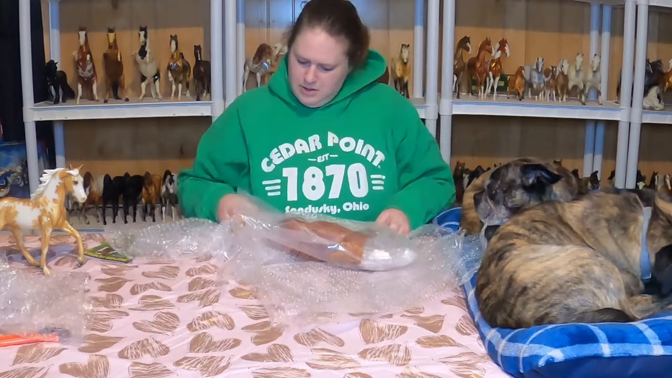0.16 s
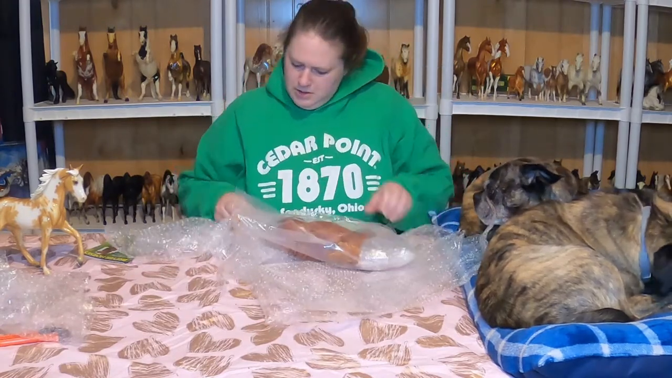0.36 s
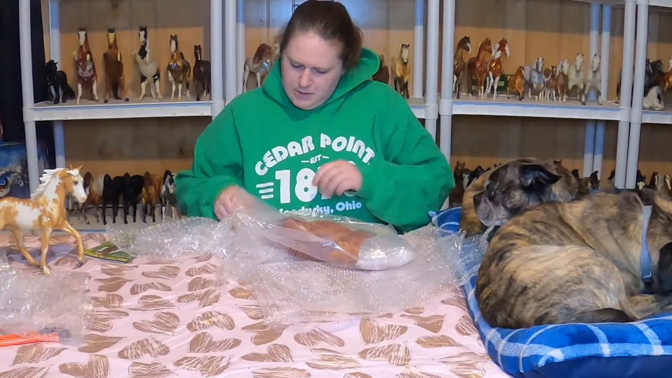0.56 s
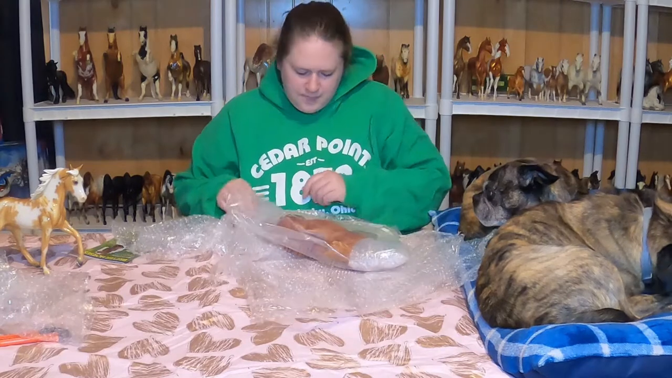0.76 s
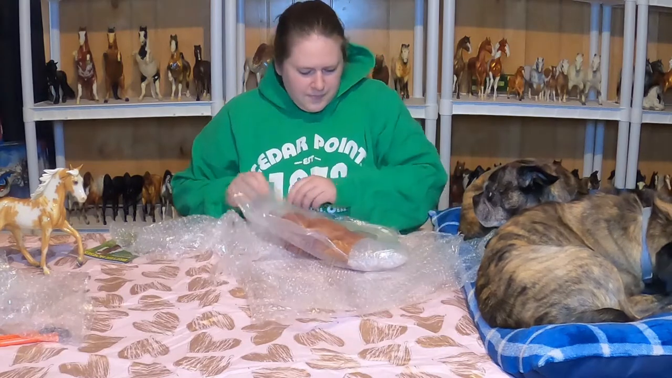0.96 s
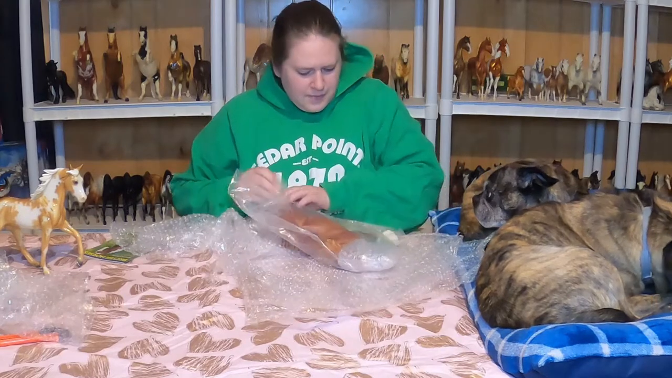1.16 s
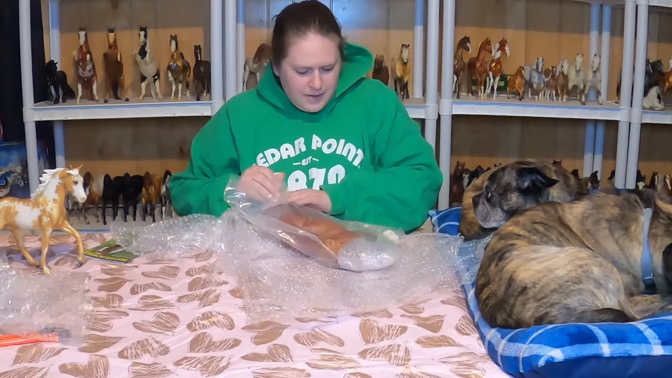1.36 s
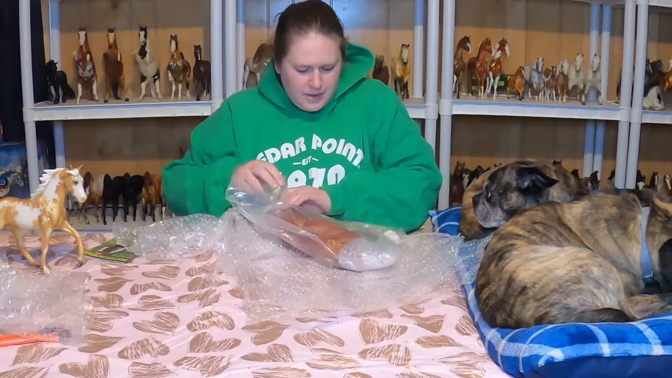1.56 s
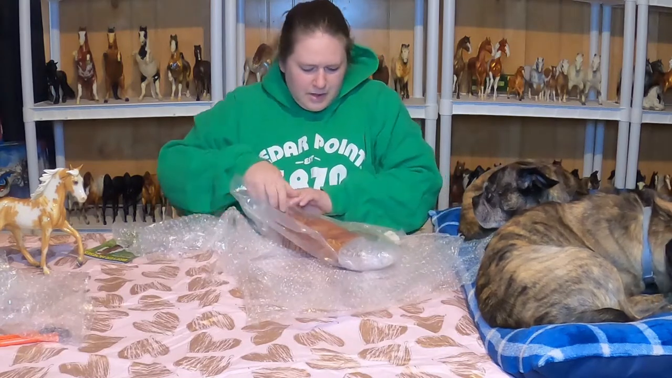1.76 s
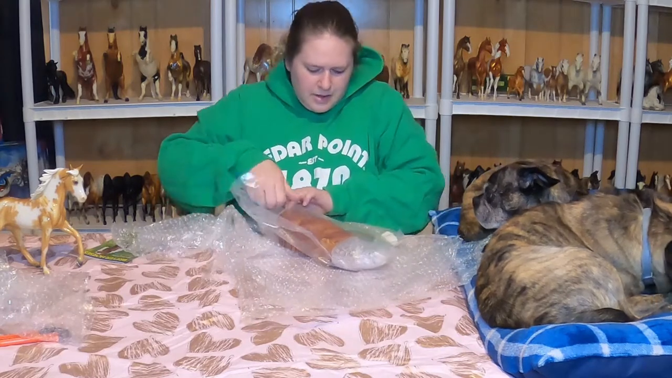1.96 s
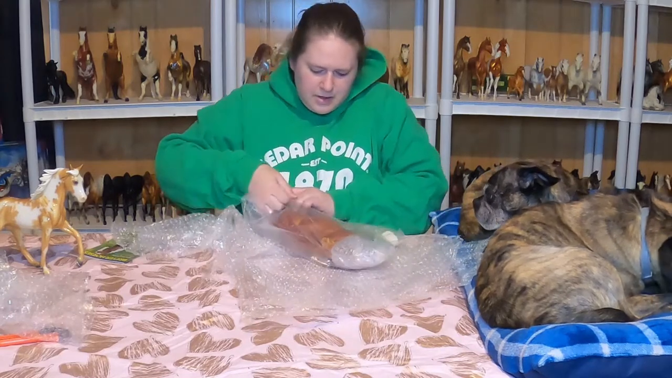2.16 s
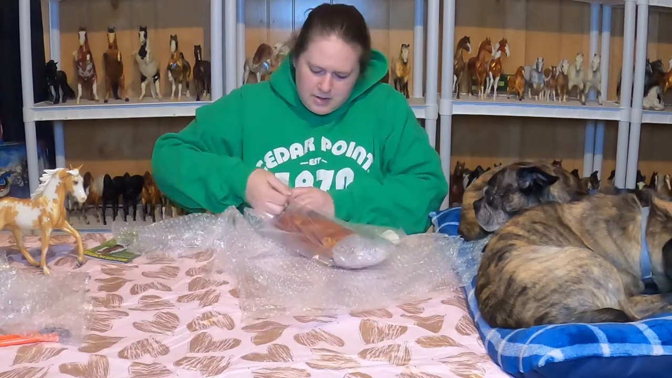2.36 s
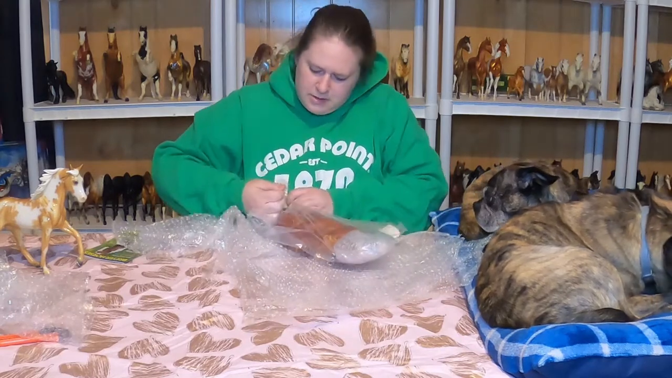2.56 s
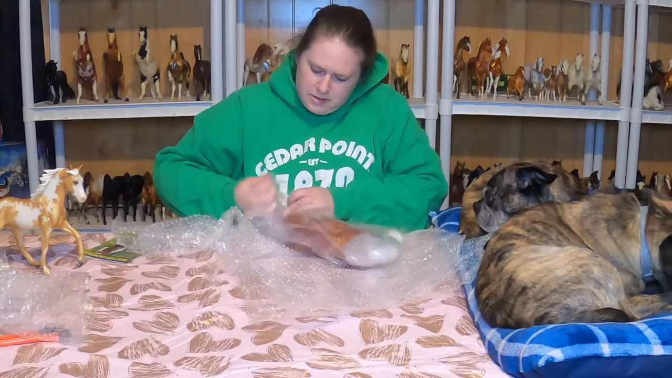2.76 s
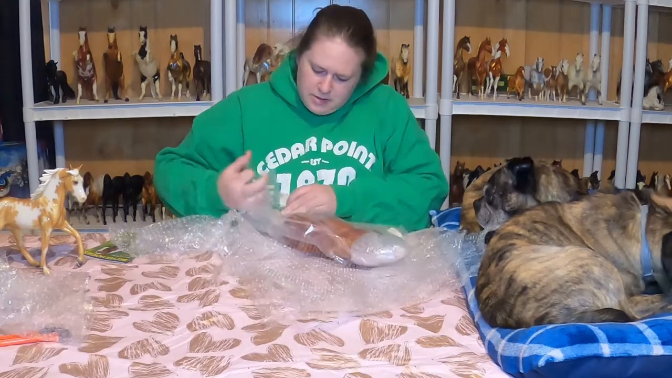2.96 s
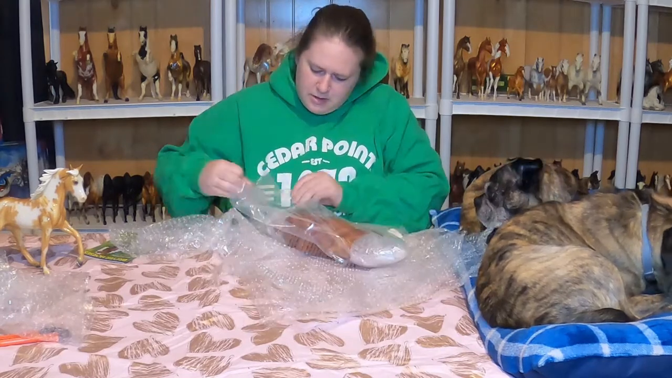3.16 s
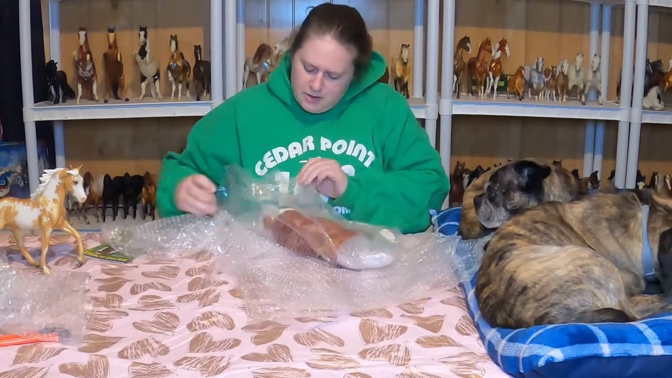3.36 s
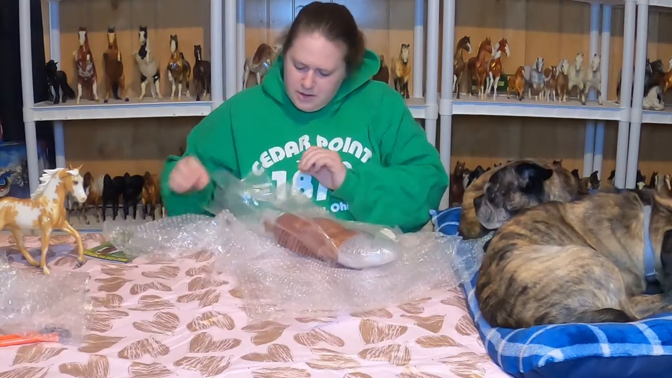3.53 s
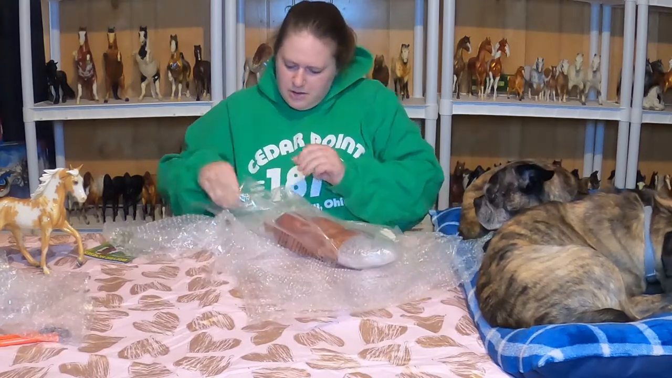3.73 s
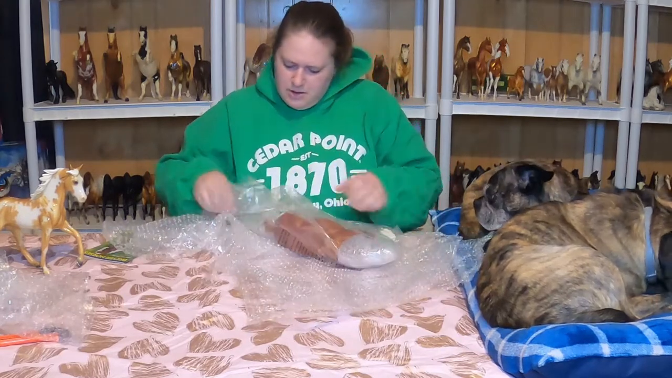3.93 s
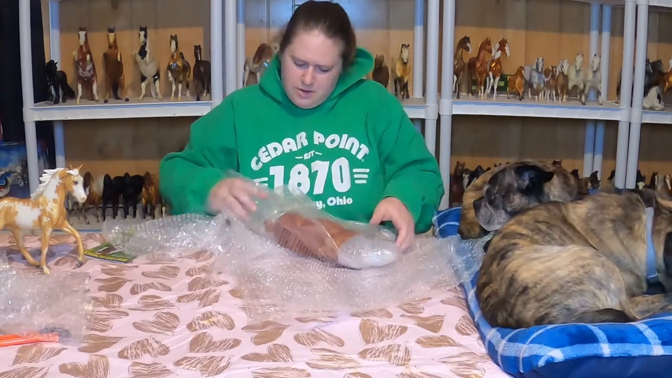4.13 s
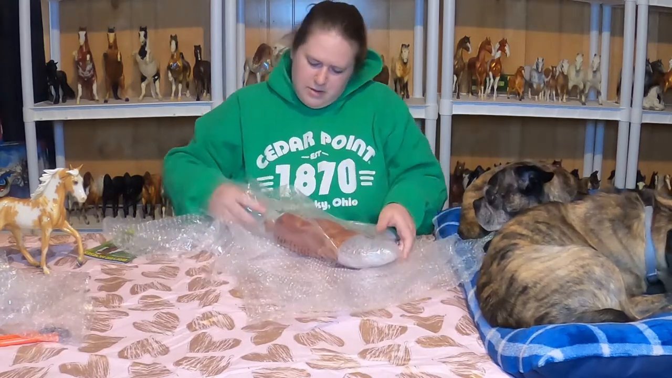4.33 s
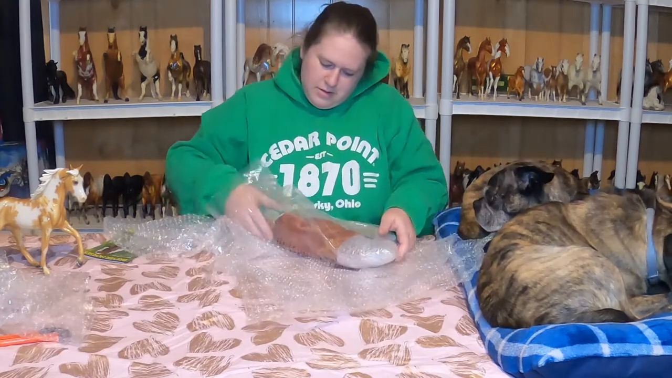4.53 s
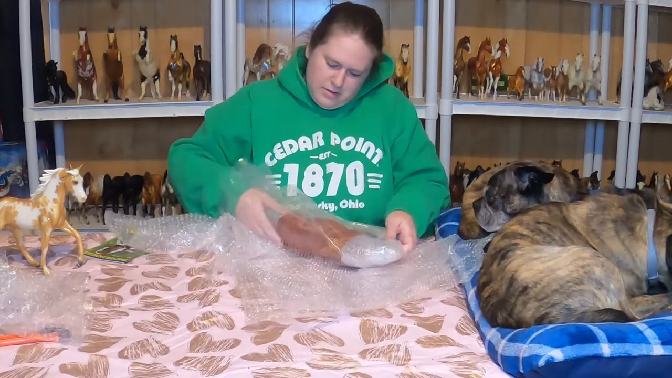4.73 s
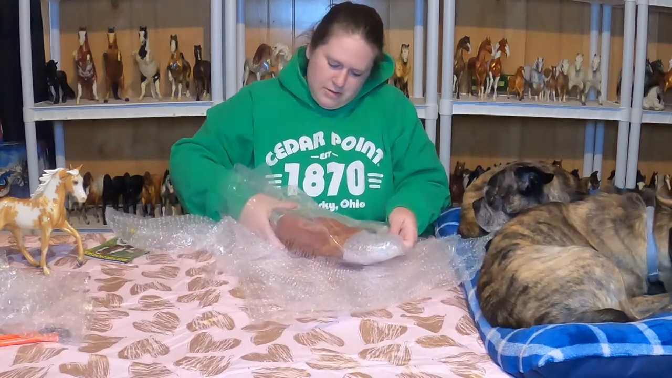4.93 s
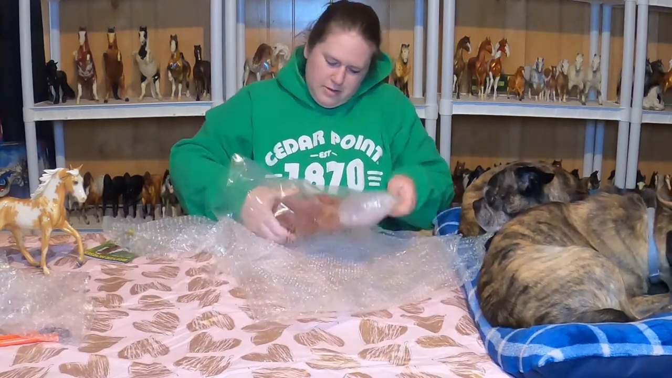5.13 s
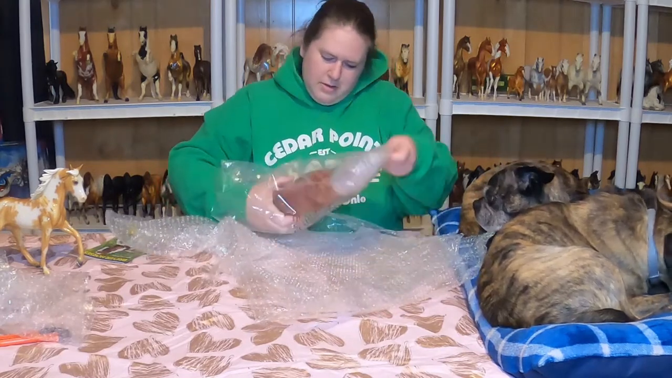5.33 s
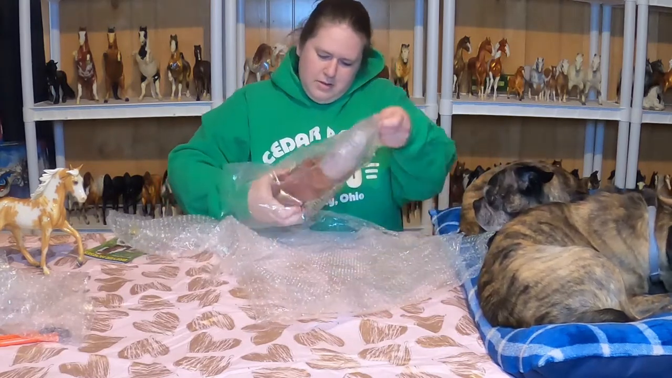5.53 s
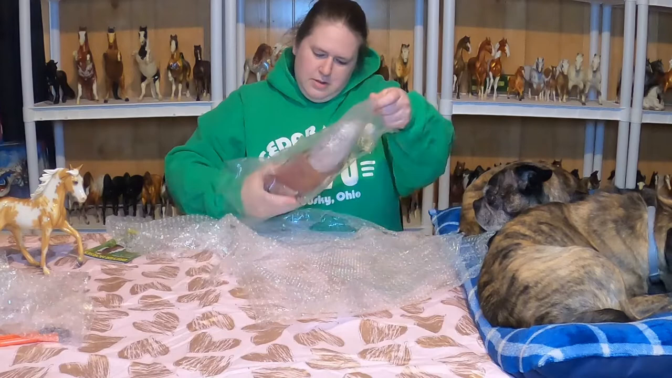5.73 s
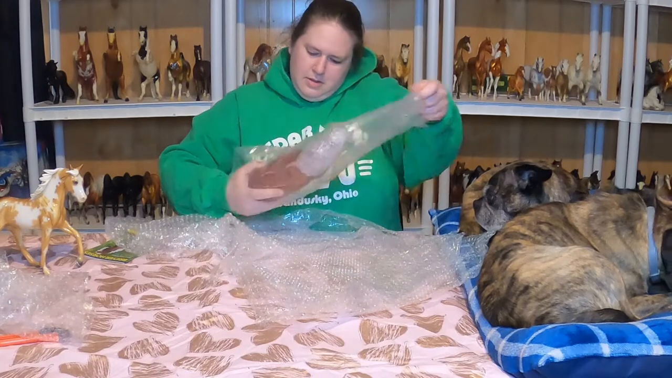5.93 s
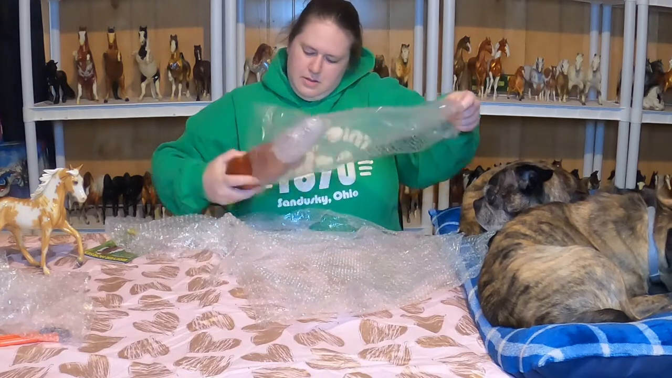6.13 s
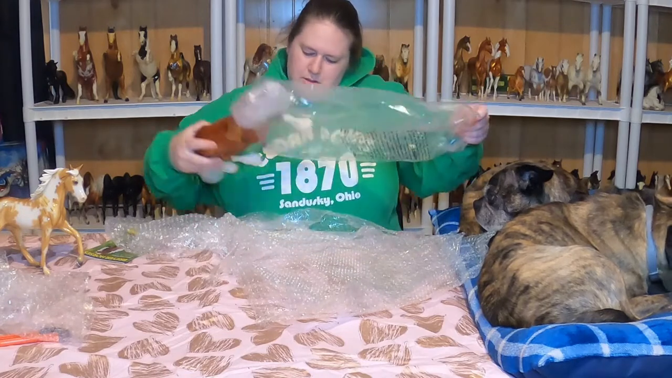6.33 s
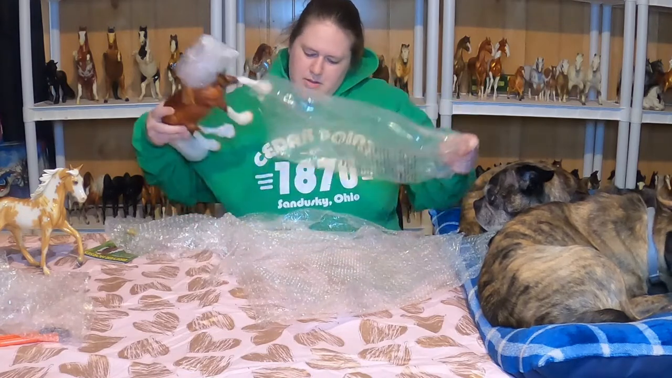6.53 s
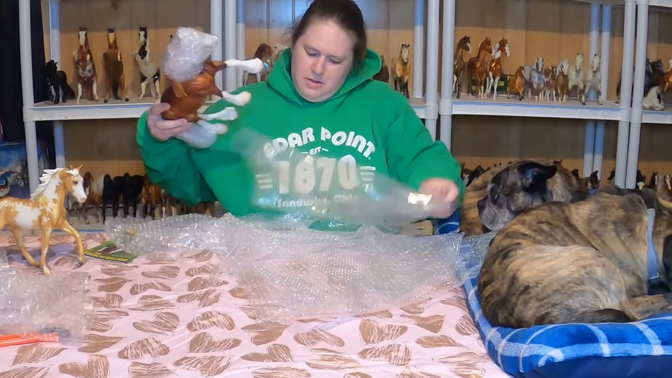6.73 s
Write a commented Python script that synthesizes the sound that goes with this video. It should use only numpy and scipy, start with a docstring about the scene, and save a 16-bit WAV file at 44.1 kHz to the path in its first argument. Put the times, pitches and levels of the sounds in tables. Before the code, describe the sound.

In a small, quiet room, plastic wrapping crinkles close to a stereo microphone as it is tugged and unfolded by hand. Film slides softly over film while creases give way in quick little snaps. About three seconds in, a single bubble pops sharply, with a brief room echo and a faint low thump. The irregular crackling and rustling then continue for about four more seconds before thinning out.

```python
"""Bubble wrap unfolded by hand on a cloth-covered table in a small furnished room, close to a stereo pair.
From the start, over a faint steady hush, each tug brings a dense fine crackle and the soft rustle of film
sliding on film, while creases buckle in short snaps. At 2.8 s one bubble bursts, far louder than the
rest; the walls answer and a soft low thud follows. The handling goes on until about 6.7 s."""
import sys
import numpy as np
from scipy import signal
from scipy.fft import rfft, irfft, next_fast_len
from scipy.io import wavfile
from scipy.ndimage import uniform_filter1d, map_coordinates

SR = 44100
rng = np.random.default_rng(int(sys.argv[2]) if len(sys.argv) > 2 else 0)


def unload_audio(sound):
    """Save the sound as a 16-bit wav file, at the path given as the first command line argument."""
    columns = np.transpose(np.atleast_2d(sound))
    # keep every value between -1 and 1, then stretch to whole-number steps
    steps = np.round(np.clip(columns, -1, 1) * 32767)
    wavfile.write(sys.argv[1], SR, steps.astype(np.int16))


N = 299439

# Steady background of the room: (freq_hz, level_db)
HUSH_COLOUR = [(12, -19), (20, -6), (44, -17), (113, -24.5), (182, -14.5), (234, -2.5), (270, -12),
               (328, -4), (574, -17), (738, -12.5), (897, -12), (1440, -6.5), (1760, -14), (2080, -14),
               (16000, -56)]
# Reverberation of the furnished room: (freq_hz, t60_s, level_db)
ROOM_DECAY = [(99, 0.2, 5), (300, 0.33, 7.5), (700, 0.38, 0), (1200, 0.34, 2.5), (2600, 0.35, 4),
              (5000, 0.52, -3), (8050, 0.35, 0.5), (13000, 0.34, -4)]
# How alike diffuse sound is at the two microphones: (freq_hz, correlation)
MIC_LIKENESS = [(30, 0.16), (70, 0.13), (130, 0.73), (350, 0.93), (700, 0.68), (1650, 0.65), (5000, 0.31),
                (15000, .05)]
# Left microphone's level over the right: (freq_hz, difference_db)
MIC_BALANCE = [(60, 0.5), (180, 1.0), (550, 1.5), (1650, 2.0), (4970, 1.5), (15000, -2)]
# Left microphone's phase behind the right: (freq_hz, lag_rad)
MIC_LAG = [(100, 0), (700, -0.13), (2600, 0.86), (5000, 0.33), (8000, 2.25), (15000, 4)]
# The low push after the pop, one row: (start_s, level_db, first_hz, last_hz, length_s)
THUD_SHAPE = (2.85, -44, 110, 25, .15)
# Tugs of the hands; treble, body and rustle are relative to the tug's level:
# (start_s, hold_s, level_db, treble_db, body_db, rustle_db)
HAND_TUGS = [(0, 0.012, -47.5, -4.5, 4, -3), (0.134, 0.042, -49.5, -3, 5.5, -6),
             (0.272, 0.056, -53, -1.5, 5, -8), (0.385, 0.045, -50, -1, 7.5, -9.5),
             (0.517, 0.056, -57, -1, 1, -5), (0.677, 0.037, -52.5, -3, 1, -5),
             (.765, 0.028, -49.5, 2, 4, -10), (0.995, 0.055, -46.5, 0.5, -2, -5),
             (1.11, 0.068, -42, -0.5, -3.5, -6.5), (1.275, 0.042, -47.5, 5, -1, -7),
             (1.404, 0.029, -48.5, 0, 5, -1.5), (1.5, 0.03, -55, -2, 4, -8),
             (1.567, .04, -51.5, -7, 1, -11), (1.668, .06, -54, 2, 6, -5), (1.813, 0.035, -48, -2, 4, -5.5),
             (1.896, 0.034, -46, 1.5, 3.5, -6), (2.113, 0.032, -46.5, -4, 4.5, -14),
             (2.194, 0.15, -47, 2, 6.5, -7.5), (2.409, 0.074, -46.5, -1, 3, -14),
             (2.566, .12, -49, 1, 3, -14), (2.744, 0.21, -48, 3, 8, -6.5), (2.947, 0.22, -50, -0.5, -1, -6),
             (3.2, .04, -50, -6, 4, -4), (3.299, 0.055, -46, 2.5, 4, -5.5), (3.443, 0.029, -47, 3, 4, -5),
             (3.528, .06, -55.5, 4, 6, -11), (3.636, 0.026, -63, -11, 6, -2), (3.933, .1, -54, 0, 5, -6),
             (4.141, 0.084, -48, -6, 3, -5), (4.287, 0.16, -52, 2.5, 7.5, -4.5),
             (4.432, 0.032, -50.5, -11, 3, -3.5), (4.53, 0.16, -49, -4.5, 7.5, -4),
             (4.796, .15, -51, -1, 7.5, -5.5), (5.072, 0.072, -46.5, -1.5, 7, -11),
             (5.195, 0.035, -53, -9, 1, -2), (5.347, 0.14, -46.5, -5.5, 2.5, -12),
             (5.477, 0.078, -44, 1, -4.5, -6), (5.597, 0.026, -52, 3, 2, -8),
             (5.703, .05, -56.5, -2, 3, -6), (5.794, 0.14, -42, -1.5, 0, -6),
             (5.988, 0.034, -44.5, -0.5, -9, -4.5), (6.076, .05, -50.5, -12, 4, 0),
             (6.142, 0.087, -43.5, -8, -1, -5), (6.258, 0.07, -45.5, 0, -4, -2),
             (6.366, 0.09, -48.5, 0, 5.5, -4), (6.594, .015, -62.5, -8, 3, -3),
             (6.64, 0.017, -58.5, -14, 0, -8)]
# Film sliding on film: (freq_hz, level_db)
RUSTLE_COLOUR = [(53, -65), (90, -26), (155, 2.5), (263, -5), (433, 0.5), (845, -8), (1010, -1),
                 (2500, -5.5), (3250, -11), (5500, -120)]
# Crackling film: (freq_hz, level_db)
FILM_COLOUR = [(290, -34), (500, -3.5), (659, -0.5), (843, -10), (1020, -2.5), (1110, -5.5), (1400, -10.5),
               (3750, -3.5), (8580, -12.5), (12300, -25.5), (16000, -32)]
# Creases that buckle loudly: (start_s, level_db, pitch_hz, treble_db)
CREASE_SNAPS = [(0.073, -37, 4610, -23), (0.308, -38, 3450, -27), (0.4002, -31.5, 2640, -13),
                (0.594, -40, 2010, -11), (0.6698, -40, 4480, -20), (0.7284, -38, 2480, -19),
                (0.7635, -34, 4990, -17), (0.7826, -31.5, 3070, -9), (0.9469, -35, 4430, -1.5),
                (0.961, -35.5, 3040, -1), (0.9958, -35, 4910, -22), (1.0115, -27.5, 3120, -35),
                (1.0834, -36, 2760, -20), (1.2615, -35, 5810, -13), (1.2725, -28.5, 3140, -12),
                (1.3004, -29, 4510, -12), (1.3203, -27, 4310, -26), (1.3806, -40, 3470, -25),
                (1.4037, -26.5, 3600, -21), (1.4581, -36, 2970, -29), (1.487, -39, 3630, -19),
                (1.5527, -30.5, 3000, -24), (1.579, -29.5, 2350, -26), (1.6691, -32.5, 2990, -28),
                (1.6964, -39, 3150, -26), (1.739, -36.5, 3450, -12), (1.8028, -41, 3380, -24),
                (1.8205, -36, 4930, -22), (1.8923, -25, 2810, -21), (1.9926, -32.5, 2430, -32),
                (2.1283, -22, 3340, -19), (2.1889, -22.5, 2070, -20), (2.2866, -22.5, 3220, -24),
                (2.3382, -35, 4580, -23), (2.4514, -30.5, 2910, -23), (2.4712, -26, 3830, -24),
                (2.582, -35, 3830, -24), (2.612, -31.5, 2410, -21), (2.6459, -32.5, 2010, -24),
                (2.7447, -41, 4010, -19), (2.9821, -32, 3150, -21), (2.99, -33, 2740, -18),
                (3.028, -32.5, 4570, 8), (3.0724, -32, 4420, -19), (3.1889, -24, 4740, -18),
                (3.238, -36, 4170, -15), (3.2959, -22, 3900, -34), (3.337, -30, 3760, -13),
                (3.4281, -30.5, 3040, -22), (3.4958, -35, 3220, -22), (3.5542, -41, 2700, -16),
                (3.5977, -34, 2320, -21), (3.66, -32.5, 2260, -27), (3.894, -33.5, 4930, -17),
                (3.928, -34, 7570, -6), (3.9576, -36, 4920, -19), (4.0065, -34.5, 3850, -20),
                (4.127, -38, 2240, -26), (4.271, -33, 2390, -19), (4.298, -33, 4540, -21),
                (4.356, -38, 3400, -21), (4.4048, -33, 4470, -21), (4.4444, -36, 3390, -27),
                (4.4732, -33, 2150, -36), (4.6162, -27.5, 2990, -32), (4.6718, -31.5, 2050, -19),
                (4.788, -30, 3240, -22), (4.8469, -28.5, 4330, -19), (4.8893, -32, 2050, -25),
                (4.9404, -33, 2140, -21), (5.077, -39, 2060, -28), (5.1138, -28, 4720, -18),
                (5.2117, -32, 2170, -39), (5.3563, -32.5, 2500, -30), (5.3814, -41, 2810, -19),
                (5.4213, -26, 4010, -22), (5.4745, -32, 2510, -26), (5.4944, -36, 3800, -28),
                (5.5333, -28.5, 2450, -21), (5.5565, -27, 3350, -29), (5.669, -32, 2400, -18),
                (5.709, -35, 5040, -9), (5.7573, -29, 2440, -43), (5.8034, -25, 2180, -17),
                (5.8347, -23.5, 2060, -34), (5.8659, -27, 3600, -30), (5.919, -25.5, 2700, -29),
                (6.0049, -25.5, 2820, -23), (6.0393, -38, 3740, -25), (6.1517, -27.5, 2680, -50),
                (6.3999, -26.5, 3090, -13), (6.47, -31, 2870, -19), (6.5902, -37, 2880, -26)]
# Ringing of the torn bubble: (pitch_hz, level_db, t60_s)
BUBBLE_MODES = [(1044, -6, 0.0041), (3060, -2.5, 0.0033), (4540, -1, 0.0026), (8700, -17.5, 0.0067),
                (12000, -30, 0.0051), (177, -23.5, 0.03)]
# The pop off the nearest surfaces: (delay_s, level_db)
NEAR_ECHOES = [(.0052, -30), (0.0128, -15)]
# The pop as it goes out to the walls: (freq_hz, level_db)
POP_ROOM_COLOUR = [(41, -35), (70, -20), (250, -13.5), (679, -15), (744, -12), (1280, -16.5), (3330, -13.5),
                   (11900, -30.5), (13600, -36), (16000, -106)]


def amp(db):
    """Decibels to gain."""
    return 10 ** (np.asarray(db) / 20)


def unit(x):
    """Scaled to rms 1."""
    return x / np.sqrt(np.mean(x ** 2) + 1e-20)


def along(table, hz, column=1):
    """One column of a frequency table, read on a log axis."""
    columns = np.transpose(table)
    return np.interp(np.log(hz + 1), np.log(columns[0] + 1), columns[column])


def hump(hz, centre_hz, octaves):
    """A bell curve on a log frequency axis."""
    return np.exp(-.5 * (np.log2((hz + 1) / centre_hz) / octaves) ** 2)


def wobble(rate_hz):
    """A smooth random curve."""
    knots = rng.standard_normal(int(N * rate_hz / SR) + 4)
    return map_coordinates(knots, [np.arange(N) * rate_hz / SR])


def filtered(x, response):
    """x through a complex frequency response."""
    size = next_fast_len(N + SR // 2)
    return irfft(rfft(x, size) * response(np.fft.rfftfreq(size, 1 / SR)), size)[..., :N]


def shortest_pulse(colour, size=2048):
    """The minimum-phase pulse of this colour."""
    cepstrum = irfft(np.log(amp(along(colour, np.fft.rfftfreq(size, 1 / SR))) + 1e-6))
    cepstrum[1:size // 2] *= 2
    cepstrum[size // 2 + 1:] = 0
    return irfft(np.exp(rfft(cepstrum)))[:size // 2]


def mid_side_gains(hz):
    """How diffuse sound divides into what the microphones share and what they do not."""
    angle = np.arccos(along(MIC_LIKENESS, hz)) / 2
    return np.array([np.cos(angle), np.sin(angle)])


def diffuse_noise(colour):
    """Coloured noise at both microphones, most alike in the low mids."""
    noise = rng.standard_normal((2, N))
    mid, side = filtered(noise, lambda hz: amp(along(colour, hz)) * mid_side_gains(hz))
    return np.array([mid + side, mid - side])


def hush(level_db=-57.5):
    """Faint steady room tone from all around."""
    return amp(level_db) * unit(diffuse_noise(HUSH_COLOUR))


def room(x, gap_s=.005, block=8192):
    """The walls answer after a short gap, each band dying at its own speed."""
    out, gap = np.zeros((2, N + SR)), round(gap_s * SR)
    for at in range(0, N, block):  # a fresh tail for each block, so it stays smooth and does not ring
        hz, t, noise = signal.stft(rng.standard_normal((2, SR // 2)), SR, nperseg=256)
        hz = hz[:, None]
        decay = amp(along(ROOM_DECAY, hz, column=2) - 60 * t / along(ROOM_DECAY, hz))
        mid, side = noise * decay * mid_side_gains(hz)
        tail = signal.istft(np.array([mid + side, mid - side]), SR, nperseg=256)[1]
        wet = signal.fftconvolve(x.mean(0)[None, at:at + block], tail / np.linalg.norm(tail[0]), axes=1)
        out[:, at + gap:][:, :wet.shape[1]] += wet
    return out[:, :N]


def thud():
    """A few cycles of low pressure, rough at first, falling in pitch, unlike at the two microphones."""
    start_s, level_db, first_hz, last_hz, length_s = THUD_SHAPE
    progress = np.clip((np.arange(N) / SR - start_s) / length_s, 0, 1)
    pitch_hz = (last_hz + (first_hz - last_hz) * np.exp(-6 * progress)) * (progress > 0)
    cycles = np.cumsum(pitch_hz) / SR + [[.3], [.42]]
    rumble = unit(filtered(rng.standard_normal((2, N)), lambda hz: hump(hz, 75, octaves=.35)))
    push = np.sin(2 * np.pi * cycles) + 0.68 * rumble * (1 - progress) ** 2
    return amp(level_db) * push * np.sin(np.pi * progress) ** 0.74


def hands(rise_db_per_s=218, fall_db_per_s=166):
    """Each tug swells, holds and settles; overlapping tugs add up and the loudest leads the colour."""
    t = np.arange(0, N, 32) / SR
    start_s, hold_s, level_db, *colours_db = np.transpose(HAND_TUGS)[:, :, None]
    before_s, after_s = np.maximum(start_s - t, 0), np.maximum(t - start_s - hold_s, 0)
    power = amp(level_db - rise_db_per_s * before_s - fall_db_per_s * after_s) ** 2
    total = power.sum(0)
    curves_db = [10 * np.log10(total)] + [(power * db).sum(0) / total for db in colours_db]
    return [np.interp(np.arange(N) / SR, t, curve) for curve in curves_db]


def rustle(level_db):
    """Film slides on film: a soft, low, uneven noise."""
    noise = diffuse_noise(RUSTLE_COLOUR)
    return amp(level_db) * unit(amp(2.5 * wobble(30)) * noise)


def buckles(start_s, level_db, pitch_hz, treble_db, pan_db, t60_s, octaves, film_db, unlike, size=256):
    """Creases give way: short noise bursts, each with its own hump and treble over the film's colour."""
    t, hz = np.arange(size) / SR, np.fft.rfftfreq(size, 1 / SR)
    lead = 16  # samples ahead of each attack
    bursts = np.roll(rng.standard_normal((len(start_s), 2, size)) * amp(-60 * t / t60_s), lead, axis=2)
    film = amp(film_db + along(FILM_COLOUR, hz) + treble_db[:, None] * np.clip(hz / 8500, 0, 1))
    colour = hump(hz, pitch_hz[:, None], octaves) + film
    mid, side = irfft(rfft(bursts) * colour[:, None], size).transpose(1, 0, 2)
    side = unlike * np.diff(side, prepend=0)  # in the treble each microphone hears its own pattern
    gain = amp(level_db) / np.abs(mid).max(1)
    at = (np.round(start_s * SR).astype(int)[:, None] + np.arange(size)).ravel()
    mics = []
    for sign in (1, -1):
        grains = (mid + sign * side) * (gain * amp(sign * pan_db / 2))[:, None]
        mics.append(np.bincount(at, grains.ravel(), N + size)[lead:N + lead])
    return np.array(mics)


def crackle(treble_db, body_db, count=11000):
    """Tiny creases give way in bunches, most faint and a few strong, over a hiss of the film's colour."""
    when, rank, pitch, place = rng.random((count, 4)).T
    grains = buckles(when * N / SR, level_db=-4 * np.log(rank + .006), pitch_hz=1200 * 4.33 ** pitch,
                     treble_db=np.zeros(count), pan_db=5 * (place - .5),
                     t60_s=0.0038, octaves=0.36, film_db=-4.0, unlike=0.6, size=128)
    bunches = amp(3.38 * wobble(60) + 0.35 * wobble(13))
    hiss = diffuse_noise(FILM_COLOUR)
    plain = amp(-1.5) * unit(bunches * grains) + amp(-7) * unit(np.sqrt(bunches) * hiss)
    treble = filtered(plain, lambda hz: 1 / (1 + (6500 / (hz + 1)) ** 4))  # taut film is brighter
    body = filtered(plain, lambda hz: hump(hz, 1300, octaves=0.27))  # air held in the folds
    return plain + (amp(treble_db) - 1) * treble + (amp(body_db) - 1) * body


def snaps(neighbours=5, plain_treble_db=-21.5):
    """Each loud crease buckles and sets off its neighbours, the later ones weaker."""
    start_s, level_db, pitch_hz, treble_db = np.repeat(CREASE_SNAPS, neighbours + 1, axis=0).T
    count = len(start_s)
    is_neighbour = np.arange(count) % (neighbours + 1) > 0
    lateness, weakness, detune = rng.random((count, 3)).T
    delay_s = .035 * lateness ** 1.5 * is_neighbour
    level_db = level_db - (9 + 180 * delay_s + 9 * weakness) * is_neighbour
    pitch_hz = pitch_hz * 2 ** (1.6 * (detune - .5) * is_neighbour)
    return buckles(start_s + delay_s, level_db, pitch_hz, treble_db - plain_treble_db,
                   pan_db=rng.normal(0, 0.54, count), t60_s=0.0061, octaves=0.24, film_db=2.5, unlike=0.55)


def pop(start_s=2.8213, level_db=-1.9, room_db=0.9, tear_s=.0006):
    """One bubble bursts: a short ring, a few ms of flapping film, near echoes and the room's tail."""
    t = np.arange(4096) / SR
    ring = sum(amp(db - 60 * t / t60_s) * np.sin(2 * np.pi * hz * t) for hz, db, t60_s in BUBBLE_MODES)
    flap = 0.24 * rng.standard_normal((2, len(t))) * amp(-60 * t / 0.0082)
    opening = np.clip(t / tear_s, 0, 1) ** 2
    burst = (ring + uniform_filter1d(flap, size=3)) * opening
    burst *= amp(level_db) / np.abs(burst).max()
    close, to_walls = np.zeros((2, N)), np.zeros((2, N))
    for delay_s, path_db in [(0.00048, 0.0126), *NEAR_ECHOES]:  # the direct path comes first
        close[:, round((start_s + delay_s) * SR):][:, :len(t)] += amp(path_db) * burst
    pulse = shortest_pulse(POP_ROOM_COLOUR)
    to_walls[:, round(start_s * SR):][:, :len(pulse)] = amp(room_db) * pulse / np.linalg.norm(pulse)
    return close + room(to_walls)


def scene(room_db=-8.0, low_cut_hz=133):
    """Film and pop close to the microphones, the walls behind them, thud and hush underneath."""
    tug_db, treble_db, body_db, rustle_db = hands()
    film = snaps() + amp(tug_db) * (crackle(treble_db, body_db) + rustle(rustle_db))
    wrap = film + amp(room_db) * room(film) + pop()
    # steep bass cut on the film and pop; thud and hush keep their lows
    low_cut = signal.butter(6, low_cut_hz, "high", fs=SR, output="sos")
    return signal.sosfilt(low_cut, wrap) + thud() + hush()


def record(dry, roll_off_hz=14300, band_limit_hz=15800):
    """The two microphones differ in level and phase and fade at the very top, up to a hard band limit."""
    def response(hz):
        sign = np.array([[1], [-1]])
        balance = amp(sign * along(MIC_BALANCE, hz) / 2)
        lag = np.exp(-.5j * sign * along(MIC_LAG, hz))
        return balance * lag / (1 + (hz / roll_off_hz) ** 24) * (hz < band_limit_hz)
    return filtered(dry, response)


dry = scene()
out = record(dry)
unload_audio(out)
```